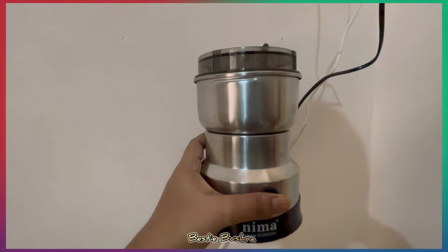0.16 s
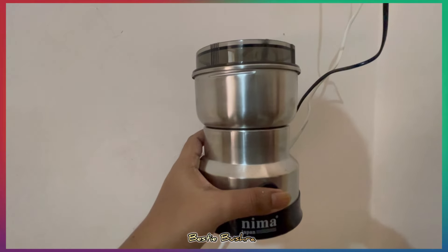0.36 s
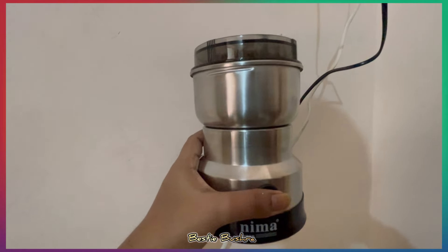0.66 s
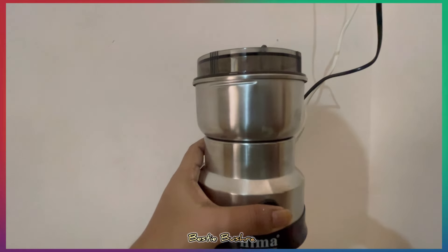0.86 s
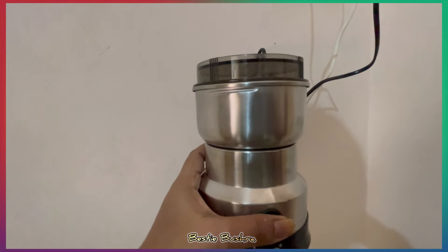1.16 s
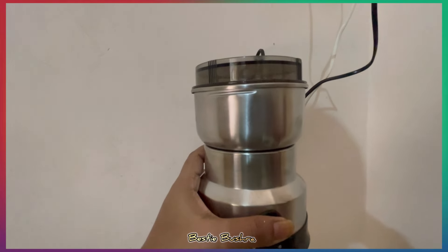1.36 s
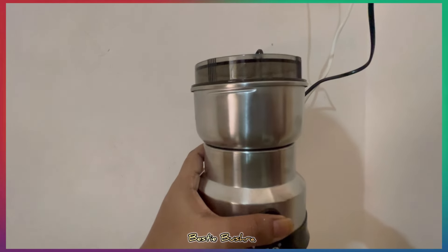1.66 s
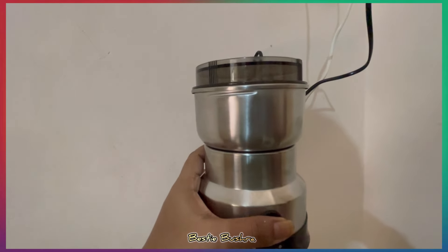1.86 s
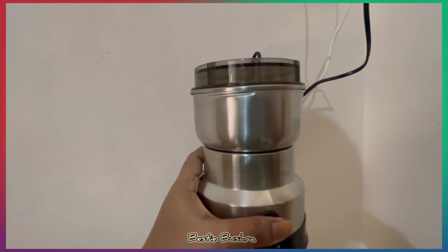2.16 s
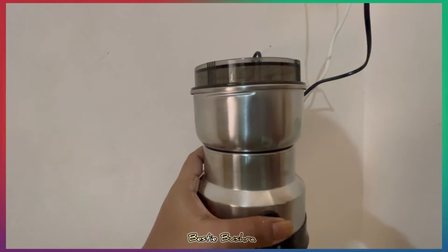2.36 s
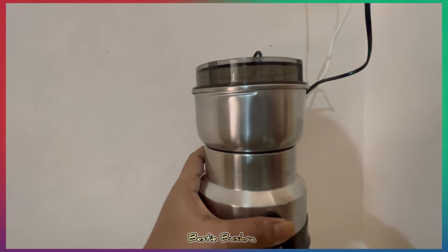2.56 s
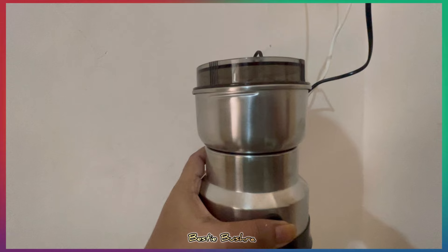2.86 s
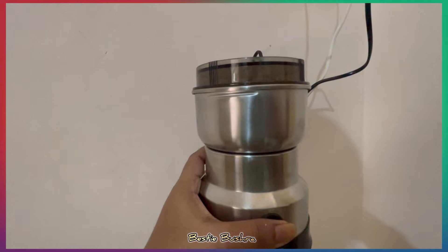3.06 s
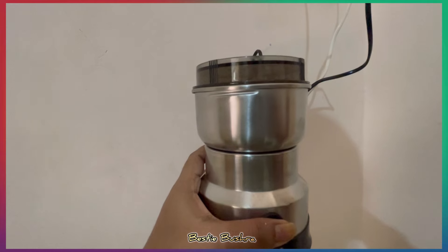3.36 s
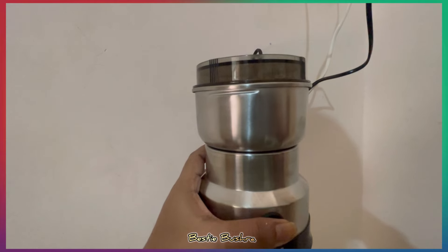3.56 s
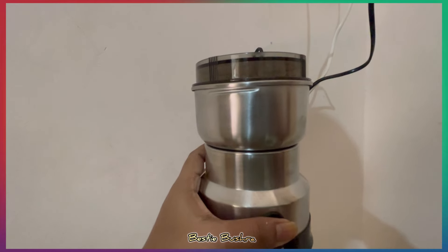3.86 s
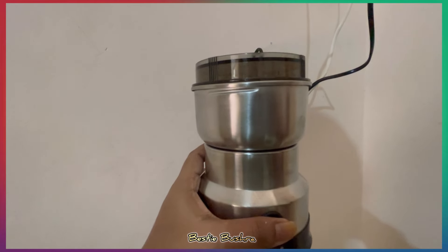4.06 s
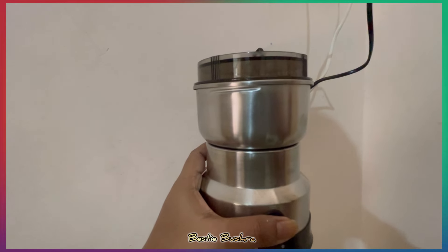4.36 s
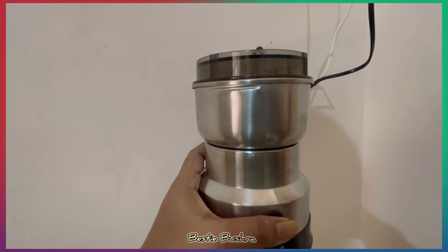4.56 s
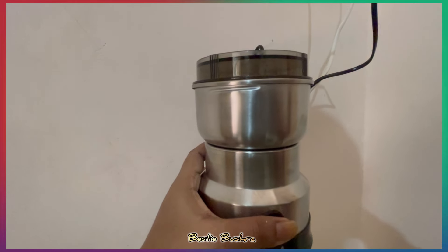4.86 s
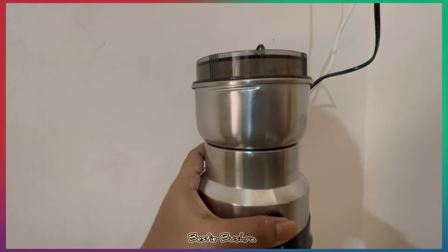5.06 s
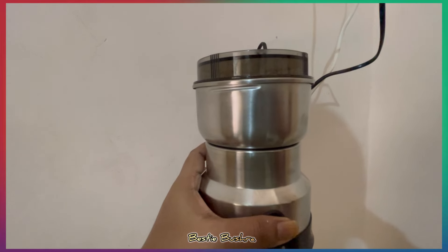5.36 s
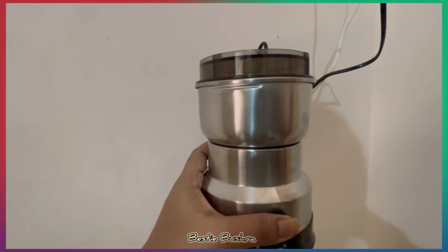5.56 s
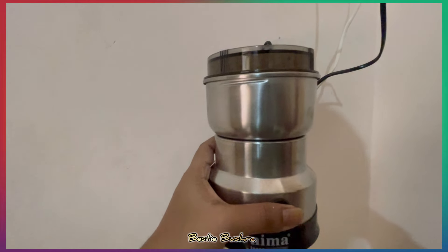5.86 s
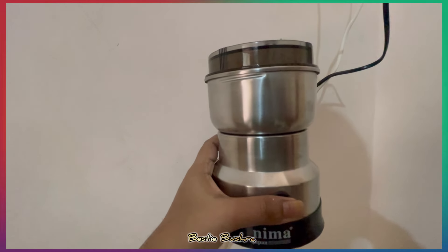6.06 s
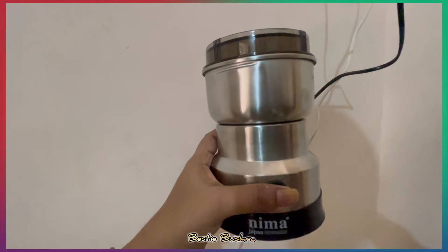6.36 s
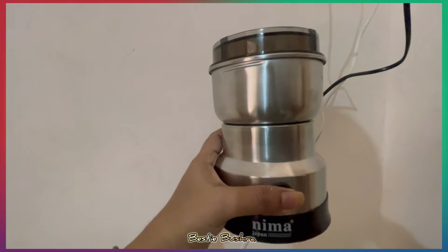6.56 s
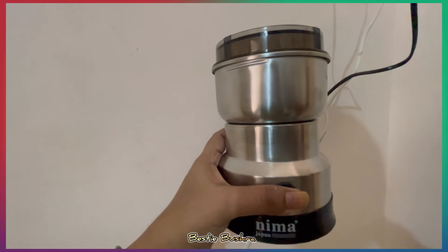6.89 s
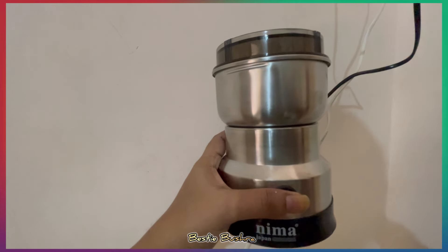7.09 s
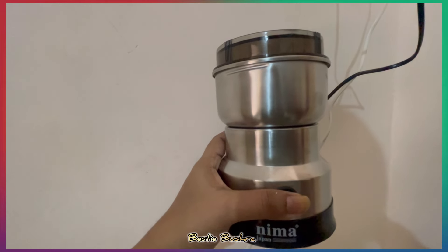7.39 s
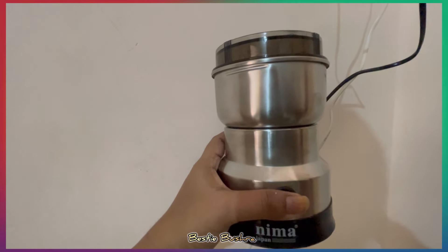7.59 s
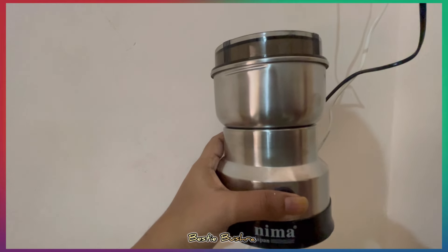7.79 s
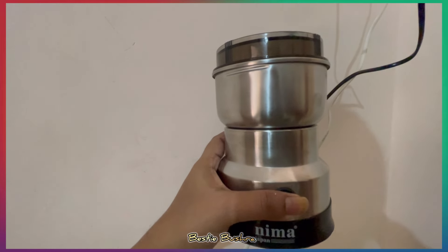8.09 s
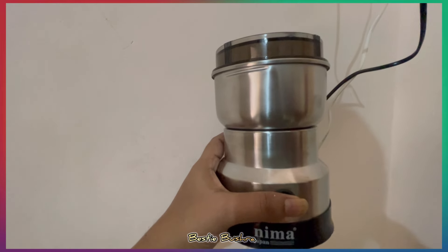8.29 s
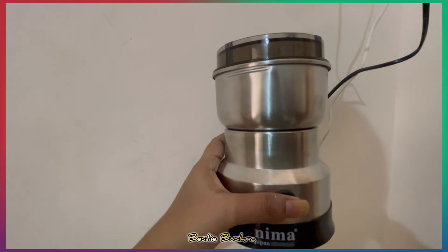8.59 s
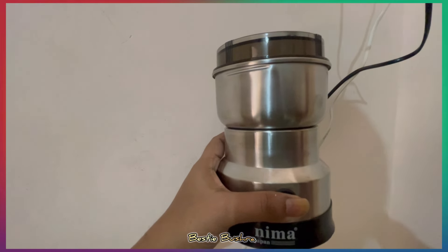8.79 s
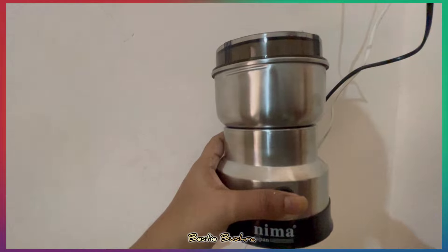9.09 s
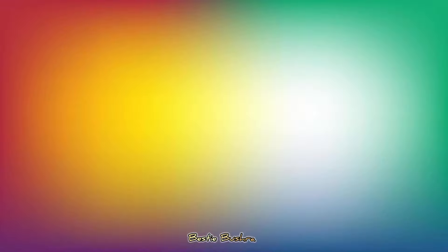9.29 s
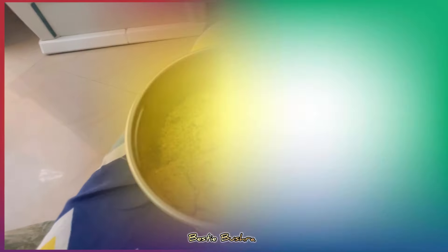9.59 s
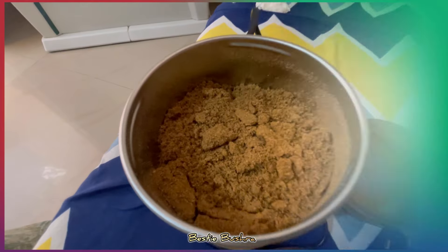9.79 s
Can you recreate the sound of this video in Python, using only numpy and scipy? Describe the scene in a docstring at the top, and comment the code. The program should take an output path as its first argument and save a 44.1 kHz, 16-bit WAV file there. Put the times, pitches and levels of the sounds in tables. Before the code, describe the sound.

After half a second of low room drone, an electric spice grinder kicks in very close to a phone microphone. A harsh burst of tumbling seeds thins within a second into dense powdery hiss and bright steel ringing over a high, slightly fluttering motor whine. Tilting the cup later recolours the sound. The running noise is chopped off without slowing down; a brief gap follows, then a quieter small room with barely audible taps and rustling.

```python
"""Hand-held electric spice grinder

It runs in a small bare room, near a two-port phone microphone. It spins up; the unbalanced shaft whines in
orders, each tone lifted by the housing resonances it crosses. Dense random impacts make whole seeds, which
thin out, and powder; they ring a steel cup and blade, tipped further in mid-run. The sound is cut off while
running; a quieter room follows. A hand rustles on the steel before the start and after the gap, where a
fingernail taps the open cup."""
import sys
import numpy as np
from scipy import signal
from scipy.fft import rfft, irfft, next_fast_len
from scipy.io import wavfile
from scipy.ndimage import uniform_filter1d

SR = 44100
rng = np.random.default_rng(int(sys.argv[2]) if len(sys.argv) > 2 else 0)


def waveform_to_disk(signal):
    """Save audio, clipped to [-1, 1], as 16-bit WAV at the path in sys.argv[1]."""
    frames = np.transpose(np.atleast_2d(signal))
    scaled = np.clip(frames, -1, 1) * 32767
    samples = np.round(scaled).astype(np.int16)
    wavfile.write(sys.argv[1], SR, samples)


N = 438354
T = np.arange(N) / SR

# Spin-up and run of the shaft: (time [s], shaft speed [turns/s])
SHAFT_SPEED = [(.72, 318.7), (.8, 368), (.88, 398), (.96, 415.6), (1.04, 427.8), (1.2, 441.5), (1.98, 474),
               (2.6, 480.6), (3.38, 487.3), (3.66, 487.5), (4.4, 494.3), (4.62, 491.2), (5.12, 495.2),
               (5.42, 487.1), (6.18, 493), (6.5, 487), (7.24, 484.8), (8.4, 490.2), (8.66, 486),
               (9.16, 487.2)]
START_S, START_HZ = .64, 240  # where the whine first comes through


def shaft():
    """Shaft speed in turns per second, and its angle in rad with a slight random unsteadiness."""
    speed_hz = np.interp(T, *np.transpose([(START_S, START_HZ), *SHAFT_SPEED]))
    turns = 2 * np.pi * np.cumsum(speed_hz + 1.196 * wobble(35)) / SR
    return speed_hz, turns


# The hand-held body's answer to the unbalance: (shaft speed [turns/s], level [dB])
UNBALANCE_ANSWER = [(240, -52), (317, -45), (356, -29), (391, -24), (418, -20.5), (433, -25.5),
                    (449, -29.5), (460, -24.5), (474, -22.5), (482, -23), (492, -20.5)]
# The third order's lead turns with the speed: (shaft speed [turns/s], left lead [rad])
THIRD_ORDER_LEAD = [(450, .5), (490, 0.36)]
# Shaft orders 2, then 4 to 12: (level off resonance [dB], change when tilted [dB], left-right [dB],
# left lead slow [rad], left lead fast [rad], turn of the lead when tilted [rad])
SHAFT_ORDERS = [(-47.5, .5, 3, 2.5, 1.2, 0), (-43, -15, -2, -0.2, 1.6, 0), (-43, -7, 0, 2.6, 1.3, -5.5),
                (-46, -6, -8, 2, 2.7, 0), (-45, -5, -7, 1.9, 1.2, -.8), (-43, -13, 1.5, -1.1, .3, -5),
                (-43, -4, 0.5, .3, 0, -4.3), (-45.5, -5, -6, 4.8, 2.7, -2.4), (-58, 15, -4.5, 1, 3, -2.7),
                (-48, 0, -2.5, 4.6, .9, 1)]
THIRD_DB, THIRD_TILTED_DB, THIRD_TILTED_RAD = -40, -8, -4.2  # third order; the last two: change when tilted
SHAKE_HZ, SHAKE_POWER = 361, 44  # the housing shakes little below this shaft speed; steepness of the onset
SLOW_HZ, FAST_HZ = 430, 485  # shaft speeds between which the leads turn
NINTH_SHARE = 0.18  # the ninth order takes only this share of the housing's lift


def motor(turns, speed_hz):
    """Tones at whole multiples of the shaft speed; the higher ones flutter at random."""
    side = np.array([[.5], [-.5]])
    tipped = tilt()
    grid_hz = np.arange(200, 520, .25)
    force_db = -10 * np.log10(1 + (SHAKE_HZ / grid_hz) ** SHAKE_POWER)

    def lift_db(order, share):
        return np.interp(speed_hz, grid_hz, force_db + share * housing_db(order * grid_hz))

    def tone(order, db, lean_db, lead):
        return np.sqrt(2) * amp(db + side * lean_db) * np.sin(order * turns + side * lead)

    whine = tone(1, along(UNBALANCE_ANSWER, speed_hz) + 0.17 * wobble(30), 2.3, .93)
    third_db = THIRD_DB + lift_db(order=3, share=0.95) + THIRD_TILTED_DB * tipped + 1.6 * wobble(25)
    whine += tone(3, third_db, 2.5, along(THIRD_ORDER_LEAD, speed_hz) + THIRD_TILTED_RAD * tipped)
    for order, row in zip([2, *range(4, 13)], SHAFT_ORDERS):
        db, tilted_db, lean_db, *leads, tilted_rad = row
        lead = np.interp(speed_hz, [SLOW_HZ, FAST_HZ], leads) + tilted_rad * tipped
        loose = min(order / 4, 1) ** 2  # the second order is steadier than the rest
        level_db = db + lift_db(order, NINTH_SHARE if order == 9 else 1) + tilted_db * tipped
        level_db += loose * (0.8 * wobble(3) + 2.5 * wobble(40))
        lean_db = lean_db + loose * 2 * wobble(2)
        whine += tone(order, level_db, lean_db, lead + loose * .4 * wobble(2))
    return whine


# Resonances that each shaft order lights up as it passes through: (frequency [Hz], width [Hz], lift [dB])
HOUSING_MODES = [(956, 275, 6.5), (1215, 108, 21.5), (1483, 124, 9), (1653, 120, 15), (1900, 105, 16),
                 (2235, 130, 13), (2405, 50, 10.5), (2755, 70, 12), (2905, 40, 11), (3025, 222, 9.5),
                 (3200, 90, 9.5), (3405, 76, 9), (3860, 240, 11.5), (4170, 140, 17), (4900, 200, 8.5)]


def housing_db(hz):
    """Lift that the housing resonances give to a tone of this frequency."""
    return 10 * np.log10(1 + sum(amp(db) ** 2 / (1 + (2 * (hz - c) / w) ** 4) for c, w, db in HOUSING_MODES))


# The hand tips the cup: (time [s], share of full tilt [0-1])
HAND_TILT = [(5.7, 0.4), (6.7, 0.89), (8.5, 0.87), (9.1, 0.59)]


def tilt():
    """How far the cup is tipped, 0-1."""
    return np.clip(np.interp(T, *np.transpose(HAND_TILT)), 0, 1)


# Powder swirl over the run: (time [s], level [dB])
GRIT_LEVEL = [(.56, -57), (.566, -25), (.573, -27), (1.05, -27), (1.65, -30.5), (5, -30), (9.24, -31.5)]
# Closed steel cup: (frequency [Hz], width [Hz], upright [dB], tilted [dB], left-right [dB])
CUP_MODES = [(5900, 90, -10, -11, 2), (7383, 50, -11, -8, 3), (8813, 32, -8.5, 2, 1),
             (9805, 30, -9, -13, 4), (10013, 20, -2, -3, 7), (10949, 28, -10, -8, -5),
             (11432, 28, -8, -10, -6), (11918, 32, -7, -6, -2), (15387, 40, -4, -5, 0)]
# Spinning blade: (frequency [Hz], width [Hz], upright [dB], tilted [dB], left-right [dB])
BLADE_MODES = [(1230, 24, -5.5, -11, -1), (1545, 30, -2, -1, -3), (1818, 10, -4.5, 8, -4),
               (2223, 18, -4, 2.5, -9.5), (2568, 14, -8, 9.5, 2.5), (3090, 130, -7.5, -7.5, -2.5),
               (5012, 37, -12, -1, 1)]


def grinding(turns):
    """Powder swirls while dense grains strike wall and blade and keep both ringing."""
    surge = amp(0.21 * wobble(9.0) + 0.69 * wobble(35))
    strikes = patchy(ports(grains(1500, spread_db=2.0)), depth_db=1.5)
    cup = unit(ring_tipping(strikes, CUP_MODES))
    # the blade faces the ports once a turn: sidebands
    sweep = 1 + .7 * np.cos(turns)
    blade = unit(ring_tipping(strikes, BLADE_MODES) * sweep)
    mix = amp(5.0) * powder_swirl(turns) + amp(-0.5) * cup + amp(-6.5) * blade
    grit_db, = curves(GRIT_LEVEL)
    return amp(grit_db) * surge * mix


# Colour of the powder: (frequency [Hz], relative density [dB per Hz])
POWDER_COLOUR = [(150, -43), (300, -24.5), (520, -10.5), (740, -38), (870, -36), (1380, -10), (1600, 1),
                 (2200, -7.5), (3300, -3), (4100, -0.5), (5000, -7.5), (7300, -7.5), (10500, -8.5),
                 (12800, -6), (14400, -4.5), (15500, -12.5)]
# The swirl changes colour in the tipped cup: (frequency [Hz], change [dB])
TIPPED_COLOUR = [(1100, 5.5), (1550, -4), (2500, 3.5), (4000, -2), (5100, 3), (6500, -0.5)]


def powder_swirl(turns):
    """A very dense stream of small impacts makes a coloured hiss, pulsing faintly once a turn."""
    powder = filtered(grains(14000, spread_db=1),
                      lambda hz: amp(along(POWDER_COLOUR, hz) + dips_db(hz, tilted=0)))
    swirl = unit(patchy(ports(powder), depth_db=4)) * (1 + .03 * np.cos(turns))

    def recolour(hz):
        return amp(along(TIPPED_COLOUR, hz) + dips_db(hz, tilted=1) - dips_db(hz, tilted=0))

    tipped = tilt()
    return (1 - tipped) * swirl + tipped * filtered(swirl, recolour)


# Narrow dips in the swirl: (frequency [Hz], width [Hz], change upright [dB], change tilted [dB])
SWIRL_DIPS = [(2040, 120, -6.5, -8), (4580, 70, -2, -13), (5650, 100, -7.5, -5), (6100, 110, -6.5, 1),
              (7000, 90, -7.5, 0.5)]


def dips_db(hz, tilted):
    """Level change that the narrow dips make at this frequency."""
    return sum(dbs[tilted] * np.exp(-((hz - c) / w) ** 2) for c, w, *dbs in SWIRL_DIPS)


# Whole seeds tumbling: (time [s], level [dB])
SEED_LEVEL = [(.56, -44), (.563, -34), (.57, -18.5), (.75, -23), (.95, -23), (1.1, -35), (4, -43),
              (9.24, -46)]
# Colour of the tumbling: (frequency [Hz], relative density [dB per Hz])
TUMBLE_COLOUR = [(200, -18.5), (431, -50), (732, 4), (863, -21), (1550, 2), (1950, 3.5), (2320, -21.5),
                 (2980, -4), (4480, -14), (5900, -1.5), (6940, -3.5), (9100, -0.5), (13000, 1), (15300, -9)]
# The first heaps of seeds thrown at the wall: (time [s], starting level [dB])
SEED_HEAPS = [(.579, -27), (.626, -23), (.647, -17.5), (0.735, -22)]
CLACK_T60 = 0.08  # s, fall of a heap by 60 dB


def tumbling_seeds():
    """Clumps of seeds strike the wall and ring the cup, loudest as the first heaps are thrown."""
    seeds = grains(3500, spread_db=1.1) * amp(2.5 * wobble(39))  # seeds come in clumps
    tumble = patchy(ports(filtered(seeds, lambda hz: amp(along(TUMBLE_COLOUR, hz)))), depth_db=2.5)
    seeds_db, = curves(SEED_LEVEL)
    gain, t = amp(seeds_db), T[:SR // 10]
    for s, db in SEED_HEAPS:
        gain[round(s * SR):][:len(t)] += amp(db - 60 * t / CLACK_T60)
    return gain * unit(tumble + amp(-7.5) * modes(tumble, CUP_MODES, tilted=0))


# Hard seeds hit by the blade: (time [s], blow level before click and ring gains [dB])
SEED_CRACKS = [(0.9577, -6), (1.0403, -8), (1.472, -6.5), (7.182, -9), (8.2711, -9), (8.286, -12)]


def cracking_seeds():
    """Each hard seed bursts in a short noisy blow that rings the closed cup."""
    return knocks(SEED_CRACKS, CUP_MODES, 0.0092, ring_db=17, click_db=-6.5, top_hz=14100)


# A fingernail on the open cup: (time [s], blow level before click and ring gains [dB])
NAIL_TAPS = [(9.411, -45), (9.423, -47)]
# The hand shifts on the steel: (time [s], blow level before click and ring gains [dB])
HAND_RUSTLES = [(.442, -65), (9.705, -62)]
# Cup with the lid off: (frequency [Hz], width [Hz], level [dB], left-right [dB])
OPEN_CUP_MODES = [(4194, 60, -8, 0), (5421, 22, -10, 0), (5970, 70, -6, 0), (6450, 60, -7, 0),
                  (8861, 20, 1, 0), (11430, 18, -3, 0)]


def hand_on_cup():
    """Short nail taps on the open cup and longer noisy rustles, all rung through the same table of steel modes."""
    taps = knocks(NAIL_TAPS, OPEN_CUP_MODES, 0.016, ring_db=26.5, click_db=-12, top_hz=12486)
    rustles = knocks(HAND_RUSTLES, OPEN_CUP_MODES, 0.33, ring_db=10, click_db=4.5, top_hz=7900)
    return taps + rustles


def knocks(events, table, burst_s, ring_db, click_db, top_hz):
    """Decaying noise blows that click and ring the steel; burst_s is their fall by 60 dB."""
    blows, t = np.zeros((2, N + 4000)), np.arange(4000) / SR
    for s, db in events:
        burst = amp(db - 60 * t / burst_s) * rng.standard_normal((2, 4000))
        blows[:, round(s * SR):][:, :4000] += burst

    def band(hz):
        return hz ** 2 / (hz ** 2 + 3500 ** 2) / (1 + (hz / top_hz) ** 8)

    blows = ports(filtered(blows[:, :N], band))
    return amp(ring_db) * ring_tipping(blows, table) + amp(click_db) * blows


def ring_tipping(blows, table):
    """Ringing that crossfades from the upright to the tilted mode levels as the cup tips."""
    tipped = tilt()
    return (1 - tipped) * modes(blows, table, tilted=0) + tipped * modes(blows, table, tilted=1)


def modes(blows, table, tilted):
    """Each resonance of the steel rings at its own pitch, facing one port more."""
    side = np.array([[.5], [-.5]])

    def response(f):
        return sum(amp(dbs[-tilted] + side * lean_db) * (1j * f * w / (hz * hz - f * f + 1j * f * w))
                   for hz, w, *dbs, lean_db in table)

    return filtered(blows, response)


# Background under the grinder: (time [s], level [dB])
ROOM_LEVEL = [(0, -45.5), (.56, -44.5), (.8, -52), (1.2, -55.5), (2, -56.5), (9.237, -54.5)]
# Its colour: (frequency [Hz], relative density [dB per Hz])
ROOM_COLOUR = [(25, -53.5), (49, -13.5), (130, -5), (470, -11.5), (894, -20.5), (1300, -15), (4000, -31.5),
               (12200, -43), (13000, -85.5)]


def running_room():
    """Room noise and drones, whose level sinks as the grinder starts."""
    room_db, = curves(ROOM_LEVEL)
    return amp(room_db) * hush(ROOM_COLOUR) + hums(room_db)


# Far machinery: (frequency [Hz], level at the last background level, before wavering [dB])
FAR_HUMS = [(61, -63), (190, -58)]


def hums(room_db):
    """Drones wavering in pitch and level, which sink with the background."""
    def drone(hz):
        waver = amp(3.4 * np.array([wobble(6.5), wobble(13)]))
        return np.sin(2 * np.pi * hz * T + 1.7 * wobble(5.3)) * waver

    sink_db = 0.79 * (room_db - ROOM_LEVEL[-1][1])
    return sum(amp(db + sink_db) * drone(hz) for hz, db in FAR_HUMS)


# The quieter room: (time [s], level [dB])
QUIET_LEVEL = [(9.298, -102), (9.308, -58), (9.94, -57.5)]
# Its colour: (frequency [Hz], relative density [dB per Hz])
QUIET_COLOUR = [(30, -33), (95, -12.5), (128, -26.5), (266, -17.5), (564, -33), (1200, -29), (2600, -43.5),
                (9700, -53.5), (11000, -90)]


def quieter_room():
    """Soft room noise that enters abruptly after the gap."""
    after_db, = curves(QUIET_LEVEL)
    return amp(after_db) * hush(QUIET_COLOUR)


# How alike the room noise is on both ports: (frequency [Hz], left-right likeness [0-1])
ROOM_LIKENESS = [(60, 0.9), (290, 0.78), (640, 0.092), (3000, 0.086)]


def hush(spectrum):
    """Coloured room noise at rms 1, alike on both ports in the bass."""
    def turn(hz):
        return np.arccos(np.clip(along(ROOM_LIKENESS, hz), 0, 1)) / 2

    def colour(hz):
        return amp(along(spectrum, hz)) * [np.cos(turn(hz)), np.sin(turn(hz))]

    mid, side = filtered(rng.standard_normal((2, N)), colour)
    return unit(np.array([mid + side, mid - side]))


# Sound at the two ports: (frequency [Hz], left lead [rad], likeness [0-1])
PORT_LEADS = [(500, .9, .7), (2500, 1.5, .55), (4000, 3.3, .65), (5500, 7, .4), (7000, 9.4, .45),
              (8000, 6.4, .7), (9300, 6.6, .7), (10500, 9.2, .3), (11500, 6.3, .4), (13400, 3.2, .95),
              (14100, 2, .75), (15200, 0, .97)]
# Balance of the two ports: (frequency [Hz], left-right [dB])
PORT_LEAN = [(1400, 2), (2800, -4), (5200, 0), (7000, 2.5), (9000, 0.5), (11500, -0.5)]


def ports(pair):
    """Direct sound reaches both ports with a phase lead; the walls add an unrelated part."""
    side = np.array([[1], [-1]])

    def turn(hz):
        return np.arccos(np.clip(along(PORT_LEADS, hz, axis=2), 0, 1)) / 2

    def place(hz):
        return amp(side * along(PORT_LEAN, hz) / 2) * np.exp(.5j * side * along(PORT_LEADS, hz))

    direct = filtered(pair[0], lambda hz: np.cos(turn(hz)) * place(hz))
    walls = filtered(pair[1], lambda hz: side * np.sin(turn(hz)) * place(hz))
    return direct + walls


def grains(per_s, spread_db):
    """Random single impacts of very unequal size, two unrelated streams."""
    hit = rng.random((2, N)) < per_s / SR
    size = amp(spread_db * rng.exponential(size=(2, N)))
    return unit(hit * rng.standard_normal((2, N)) * size)


def patchy(x, depth_db):
    """Narrow bands swell and fade slowly at random."""
    z = signal.stft(x, nperseg=1024)[2]
    field = uniform_filter1d(rng.standard_normal(z.shape[1:]), size=2, axis=0)
    field = uniform_filter1d(field, size=40, axis=1)
    return signal.istft(z * amp(depth_db * unit(field)), nperseg=1024)[1][:, :N]


def wobble(rate):
    """A random curve of straight lines between knots, rate knots a second."""
    return np.interp(T * rate, np.arange(400), rng.standard_normal(400))


def amp(db):
    """Gain of a level in dB."""
    return 10 ** (np.asarray(db) / 20)


def unit(x):
    """Scaled to rms 1."""
    return x / np.sqrt(np.mean(x ** 2) + 1e-20)


def along(points, hz, axis=1):
    """One column of (Hz, ..) points, read on a log axis."""
    rows = np.transpose(points)
    return np.interp(np.log(hz + 1), np.log(rows[0] + 1), rows[axis])


def curves(rows):
    """One value per sample for each column after the time; -120 (silent) outside."""
    s, *cols = np.transpose(rows)
    return [np.interp(T, s, c, left=-120, right=-120) for c in cols]


def filtered(x, response):
    """x shaped by a complex response of frequency."""
    m = next_fast_len(N + 8192)
    return irfft(rfft(x, m) * response(np.fft.rfftfreq(m, 1 / SR)), m)[..., :N]


CUT = 9.238  # s, the running sound ends


def scene():
    """The running grinder is cut off with a very short tail; the second room enters abruptly after a gap."""
    speed_hz, turns = shaft()
    running = motor(turns, speed_hz) * (T > START_S) + grinding(turns) + tumbling_seeds()
    running += cracking_seeds() + running_room()
    # the tail is a faint copy, 1200 samples late, falling 1300 dB per second
    late = np.pad(running, ((0, 0), (1200, 0)))[:, :N]
    tail = amp(-27.5) * late * amp(-1300 * np.maximum(T - CUT, 0))
    return np.where(T < CUT, running, tail) + quieter_room() + hand_on_cup()


def record(dry):
    """The phone rounds off the highest peaks and keeps nothing above its band limit."""
    soft = dry / (1 + np.abs(dry / .65) ** 4) ** .25
    # the treble closes between 15600 and 15800 Hz
    return filtered(soft, lambda hz: np.cos(np.pi / 2 * np.clip((hz - 15600) / 200, 0, 1)) ** 2)


dry = scene()
out = record(dry)
waveform_to_disk(out)
```